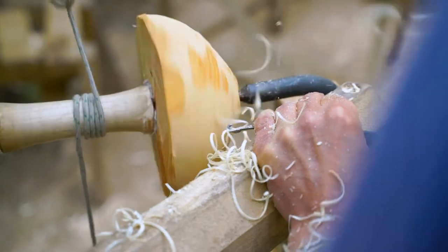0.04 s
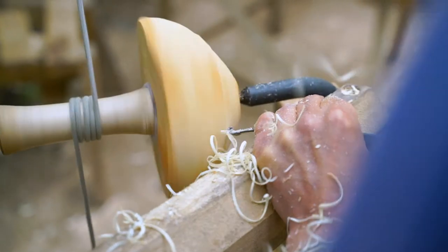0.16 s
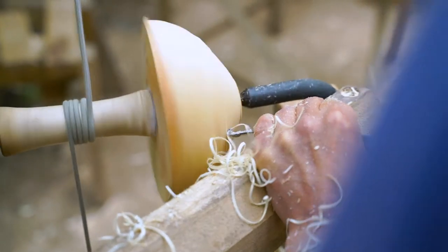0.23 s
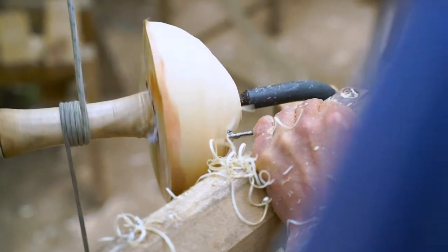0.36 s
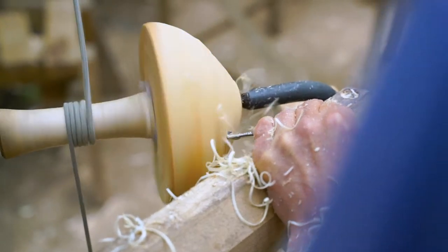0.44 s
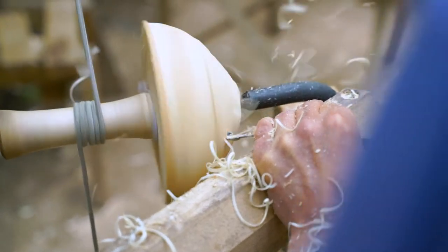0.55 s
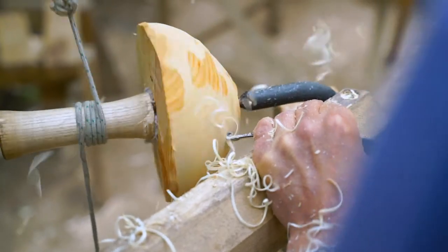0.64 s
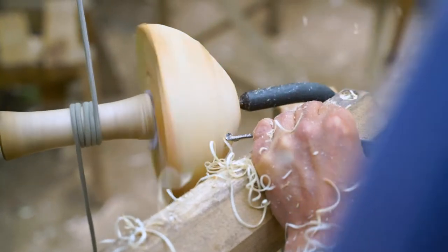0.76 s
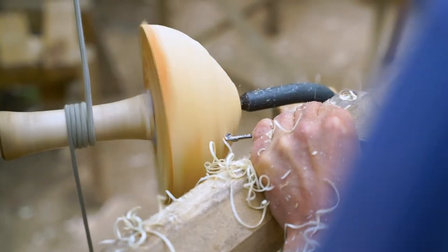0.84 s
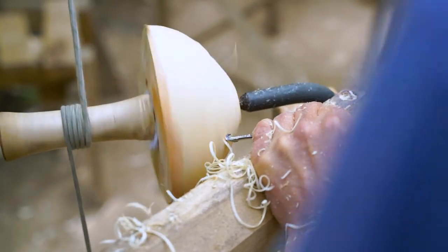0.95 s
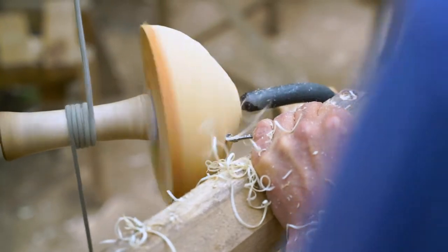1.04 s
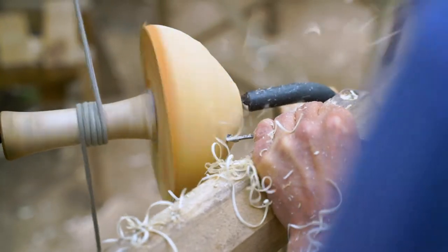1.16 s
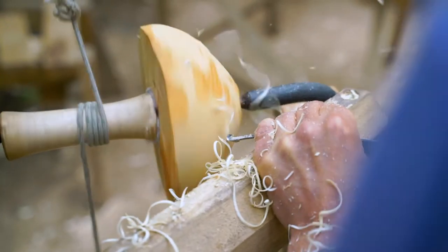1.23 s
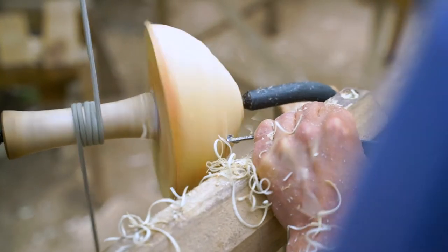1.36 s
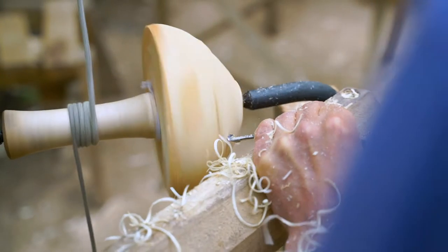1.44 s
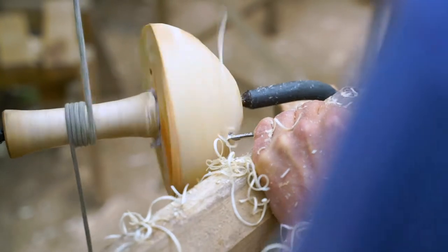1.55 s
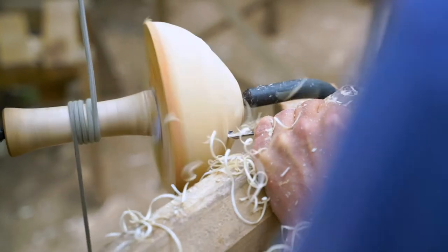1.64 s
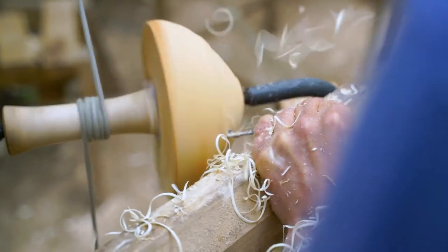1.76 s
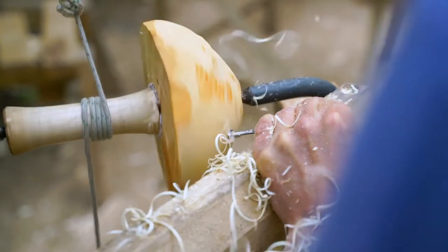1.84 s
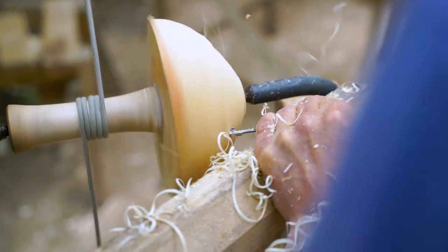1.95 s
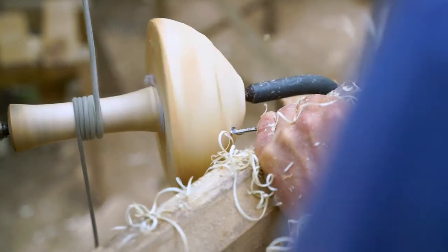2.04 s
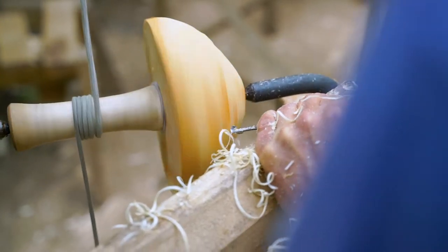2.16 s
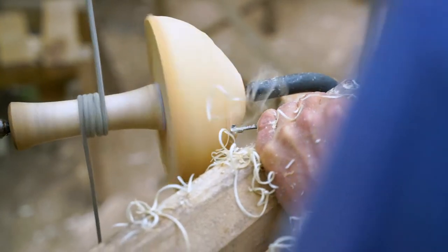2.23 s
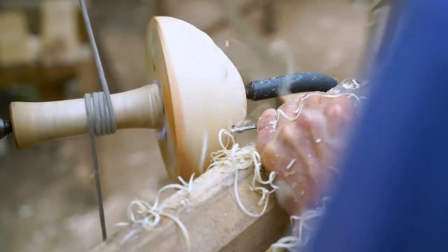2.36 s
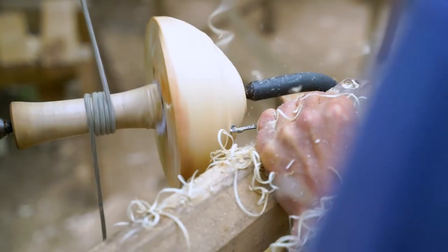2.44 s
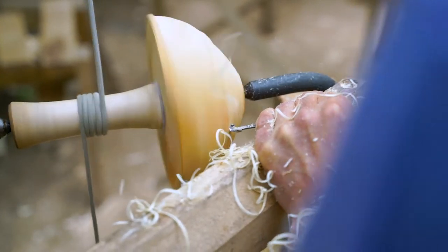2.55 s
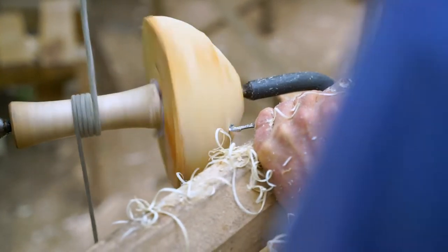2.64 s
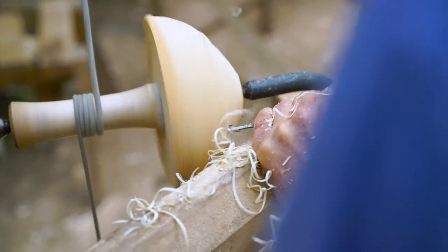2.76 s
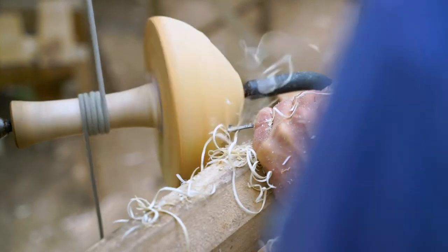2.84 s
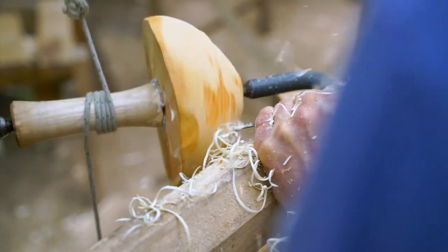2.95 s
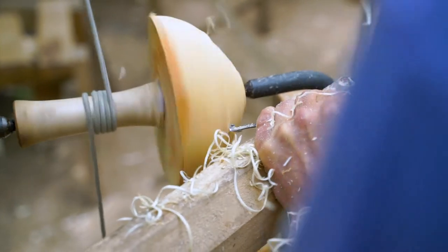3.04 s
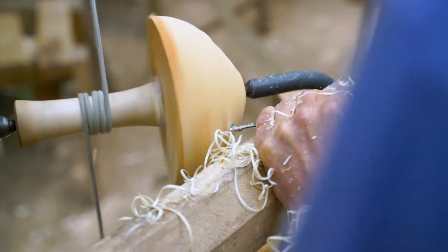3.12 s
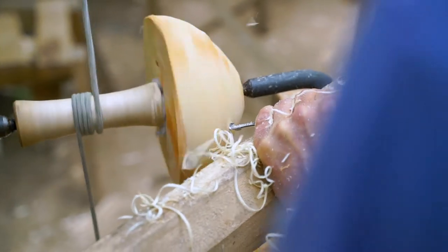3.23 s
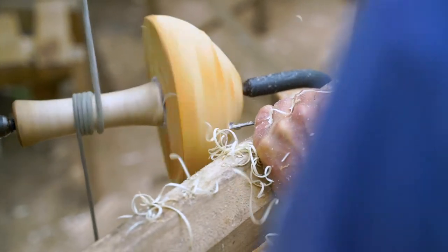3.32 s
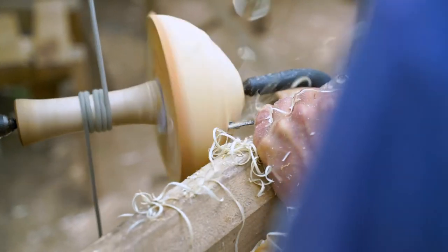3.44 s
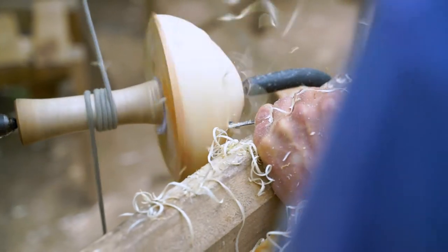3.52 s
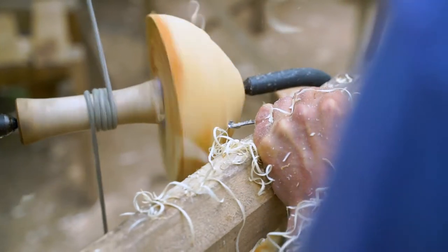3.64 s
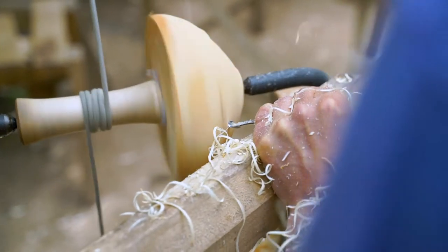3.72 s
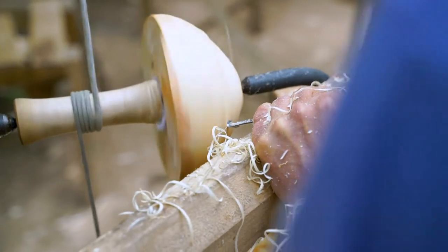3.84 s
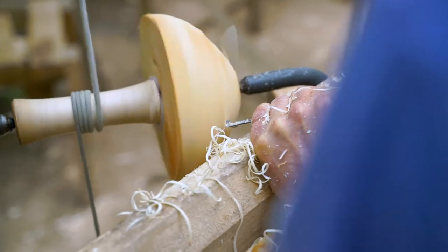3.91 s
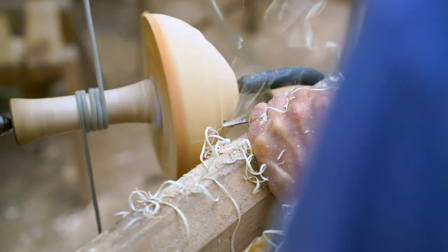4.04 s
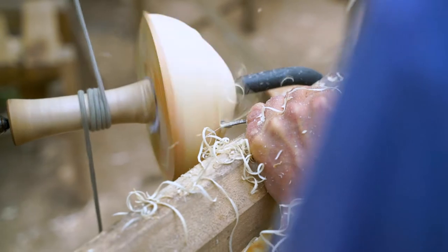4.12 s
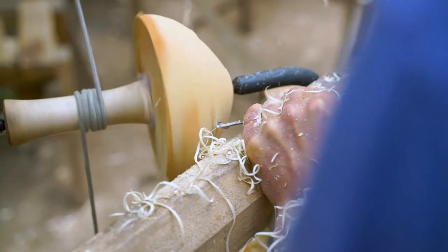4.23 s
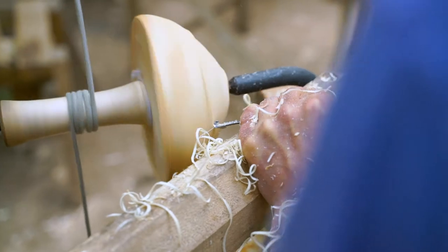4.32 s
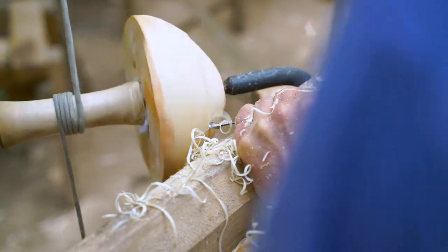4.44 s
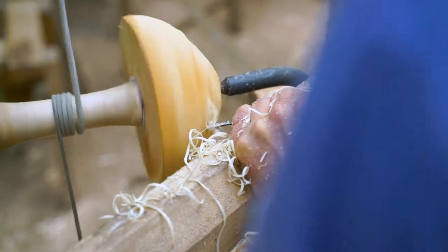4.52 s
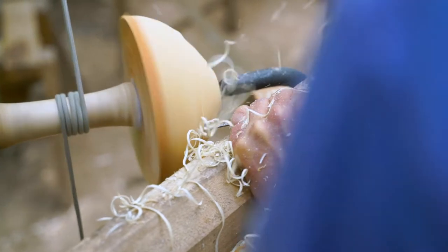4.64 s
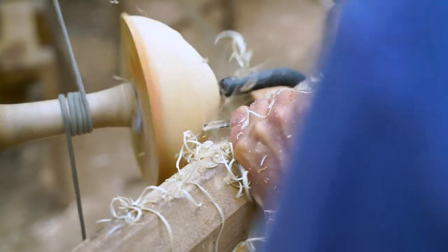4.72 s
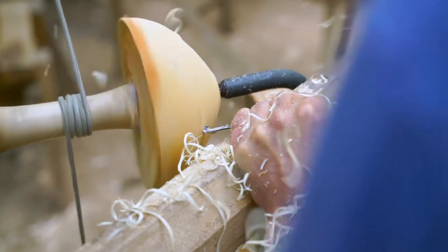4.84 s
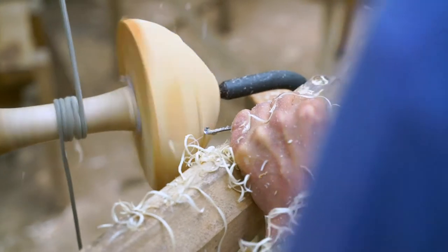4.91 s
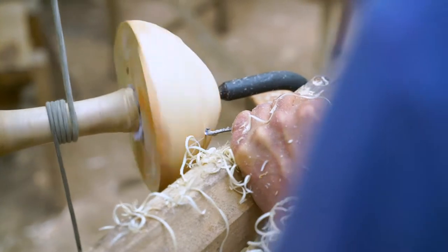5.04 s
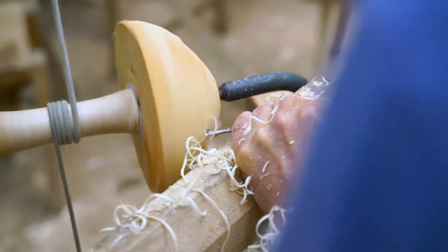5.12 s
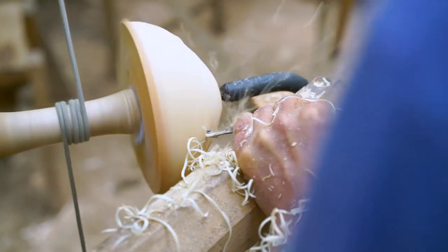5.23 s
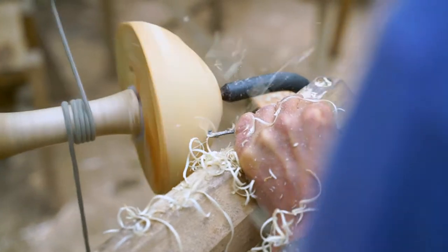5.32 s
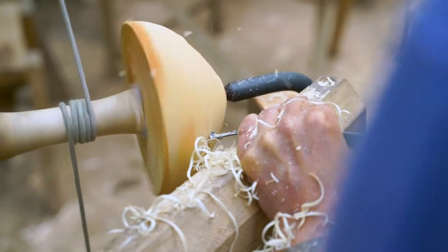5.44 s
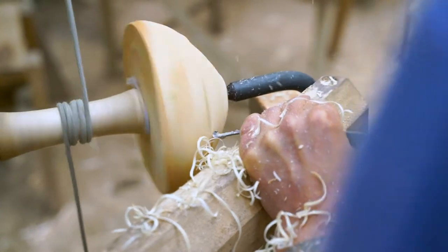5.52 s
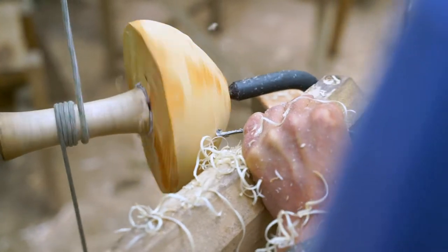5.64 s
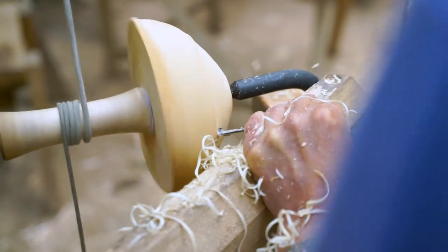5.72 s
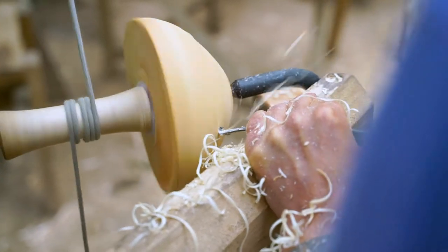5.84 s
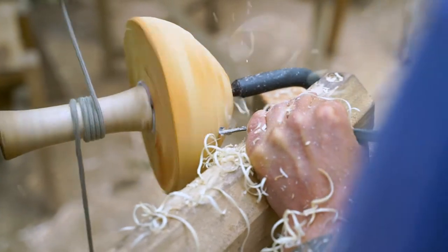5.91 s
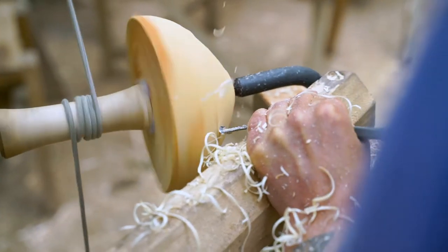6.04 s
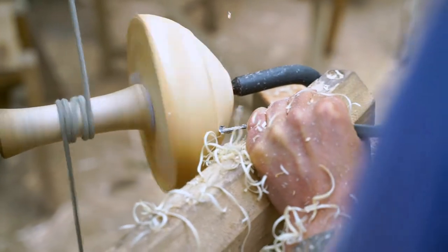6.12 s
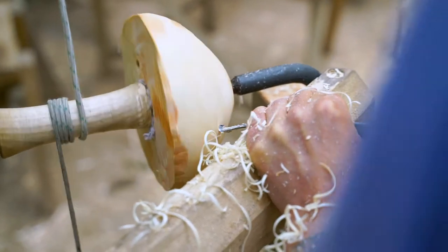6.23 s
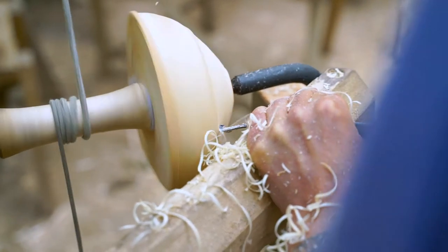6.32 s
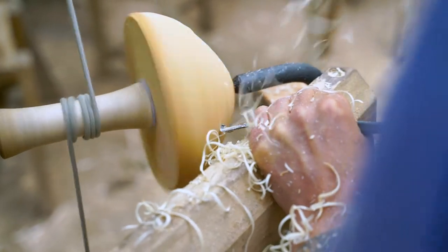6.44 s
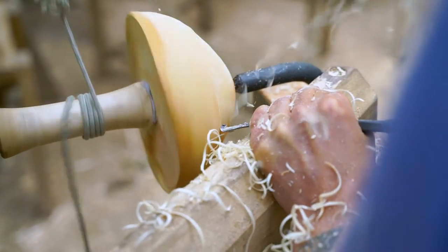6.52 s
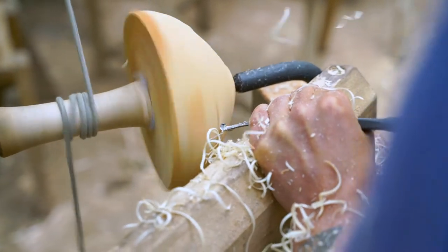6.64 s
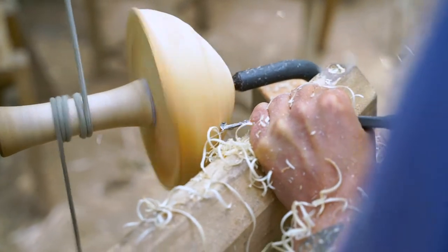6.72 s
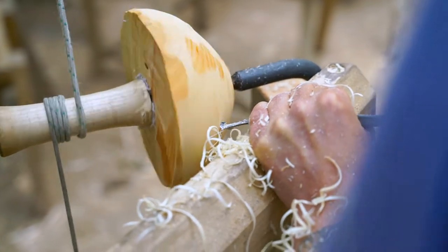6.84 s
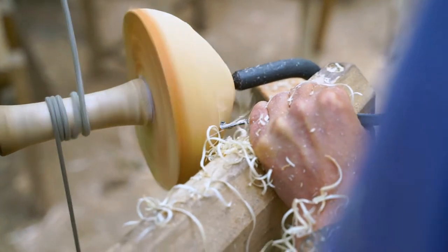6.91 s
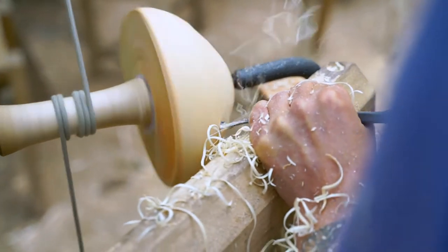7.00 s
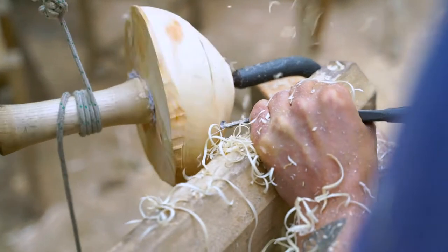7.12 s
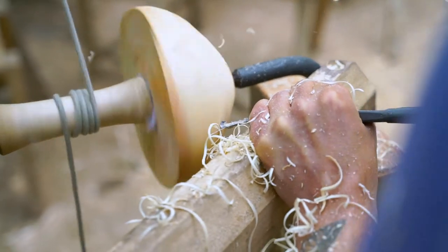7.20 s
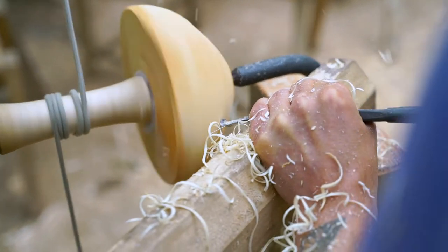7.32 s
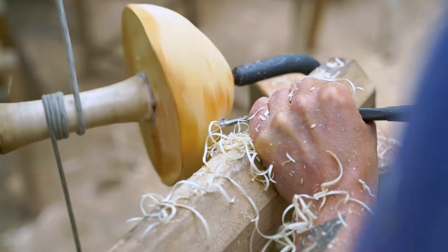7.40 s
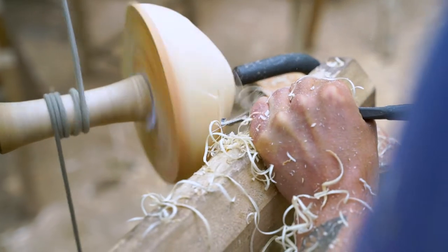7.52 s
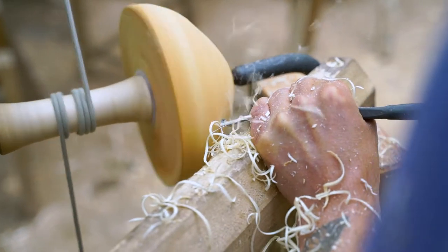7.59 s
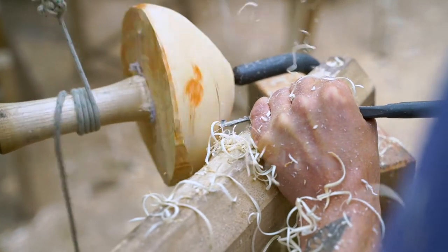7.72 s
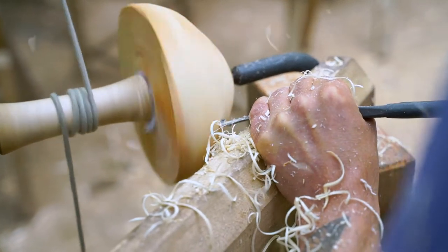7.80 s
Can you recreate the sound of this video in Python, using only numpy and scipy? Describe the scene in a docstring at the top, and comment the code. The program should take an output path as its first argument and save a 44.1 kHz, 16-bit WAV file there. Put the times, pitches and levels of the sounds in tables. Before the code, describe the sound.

A hook tool tears rhythmically at a spinning wooden bowl, rasping and chattering about every 0.6 seconds, with hissing shavings and soft wooden frame knocks.

```python
"""A hook tool cuts a wooden bowl on a treadle lathe: each down-stroke tears fibres, with dig-ins that chatter.
Fibre noise and pitched chatter ring resonances of bowl and tool; the return stroke only brushes the wood.
Shavings hiss as dense filtered crackle. The timber frame rattles and knocks through beam resonances.
Noise bursts give dry ticks; slow lumpy noise gives wind at a close stereo microphone, with faint reflections."""
import sys
import numpy as np
from scipy import signal
from scipy.fft import rfft, irfft, next_fast_len
from scipy.io import wavfile
from scipy.ndimage import uniform_filter1d

SR = 44100
rng = np.random.default_rng(int(sys.argv[2]) if len(sys.argv) > 2 else 0)


def int16_out(signal):
    """Quantize to a 16-bit WAV file."""
    q = np.round(np.clip(np.atleast_2d(signal).T, -1, 1) * 32767)
    wavfile.write(sys.argv[1], SR, q.astype(np.int16))


N = 346626
SIZE = next_fast_len(N + SR)
HZ = np.fft.rfftfreq(SIZE, 1 / SR)
TIME_S = np.arange(N) / SR

# cutting down-strokes: start_s, rise_s, length_s, crest_0_to_1, pressure_db, hiss_db, rattle_db
CUTTING_STROKES = [(-.16, 0.023, 0.24, 0.48, -13.5, -24.5, -26),
                   (0.4, 0.031, 0.27, 0.58, -13.5, -26.5, -26), (1.003, 0.063, 0.25, 0.2, -15, -25, -25),
                   (1.593, 0.0084, 0.25, 0.95, -14.5, -25.5, -26),
                   (2.165, 0.086, .25, 0, -11.5, -24, -23.5), (2.766, 0.053, 0.22, 0.26, -11, -22.5, -19),
                   (3.332, 0.061, 0.25, 0, -11, -25.5, -23.5),
                   (3.955, 0.047, 0.22, 0.16, -10.5, -24.5, -23.5),
                   (4.516, 0.05, 0.28, 0.44, -11, -27, -23), (5.205, 0.044, 0.17, 0.18, -14, -23.5, -25),
                   (5.825, 0.038, 0.13, 0.63, -15, -22.5, -23),
                   (6.325, 0.071, 0.22, 0.57, -13, -21.5, -20.5),
                   (6.915, 0.04, 0.22, 0.63, -13.5, -20.5, -22), (7.497, 0.028, 0.24, 0.9, -17.5, -20, -23)]
# returns, edge brushing the wood: start_s, rise_s, length_s, crest_0_to_1, pressure_db, hiss_db, rattle_db
RETURN_STROKES = [(0.251, 0.029, 0.13, 0.89, -29, -38, -24.5), (.79, 0.035, 0.21, 0.97, -39.5, -48, -30.5),
                  (1.375, 0.011, 0.18, 0.31, -29, -37, -20.5), (1.97, 0.024, 0.18, 0.37, -46, -41.5, -31),
                  (2.59, 0.044, 0.17, 0.41, -34, -47, -28.5), (3.069, 0.046, 0.21, 1, -28.5, -34, -23),
                  (3.73, 0.0078, 0.33, 0.65, -42.5, -57, -38), (4.301, 0.024, 0.031, 0.31, -31.5, -59, -35),
                  (4.46, 0.011, 0.029, 1, -38, -47, -24.5), (5.061, 0.015, 0.061, 0.18, -37, -45.5, -29),
                  (5.14, 0.027, 0.03, 0.32, -24.5, -48, -28),
                  (5.491, 0.026, 0.2, 0.51, -30.5, -41.5, -22.5),
                  (5.72, 0.035, 0.079, 0.43, -32, -44.5, -38), (6.191, 0.025, 0.091, 0.42, -28, -42.5, -23),
                  (6.721, 0.081, .15, 0.63, -28.5, -38.5, -23), (7.301, 0.0063, 0.15, 0.19, -51, -42, -36),
                  (7.40, 0.029, 0.13, 0.72, -33, -61, -19.5)]
# edge digging in: start_s, level_db, chatter_hz
DIG_INS = [(0.0074, -13.5, 2510), (0.0403, -8, 2393), (0.426, -22, 2270), (0.4596, -7, 1194),
           (0.499, -12, 2580), (0.535, -10, 2330), (0.566, -13.5, 2520), (0.601, -13, 2030),
           (0.6361, -11.5, 1923), (1.0514, -8, 1297), (1.1227, -10.5, 2430), (1.1529, -10.5, 2804),
           (1.182, -14.5, 2460), (1.216, -8.5, 2344), (1.62, -11.5, 1248), (1.6422, -4.5, 1174),
           (1.6854, -10, 1890), (1.7526, -10.5, 2380), (1.7825, -7.5, 2180), (1.821, -18, 2606),
           (2.187, -26, 1220), (2.2143, -19.5, 1200), (2.29, -16.5, 1880), (2.32, -11.5, 2460),
           (2.353, -14, 1752), (2.388, -12.5, 1557), (2.8075, -9, 1210), (2.8755, -16.5, 2470),
           (2.9005, -10, 2444), (2.963, -12.5, 1310), (3.405, -20, 2550), (3.4224, -11, 2190),
           (3.451, -11, 1950), (3.489, -10, 2384), (3.5229, -11.5, 1800), (3.553, -13, 1390),
           (3.9889, -10, 1208), (4.0286, -21, 1350), (4.059, -19, 1760), (4.0904, -11, 2460),
           (4.122, -11.5, 1630), (4.156, -9.5, 1410), (4.577, -6.5, 965), (4.6232, -11.5, 2520),
           (4.6603, -12, 1227), (4.696, -11, 2053), (4.7252, -16.5, 1257), (4.762, -7.5, 1733),
           (5.0764, -29.5, 1220), (5.188, -11.5, 1202), (5.2287, -18, 1167), (5.2576, -6.5, 2113),
           (5.2838, -11.5, 2760), (5.3113, -16, 2620), (5.346, -17, 2210), (5.3931, -24.5, 1224),
           (5.66, -28.5, 1210), (5.905, -13.5, 2350), (5.939, -19, 1242), (6.324, -26, 1240),
           (6.372, -19, 1210), (6.386, -19, 1290), (6.436, -18, 1270), (6.465, -19.5, 1246),
           (6.937, -18.5, 1193), (6.977, -19, 1266), (7.04, -10, 5130), (7.0851, -17, 1160),
           (7.101, -10, 6600), (7.428, -26.5, 1180), (7.499, -19, 1990), (7.5433, -13.5, 2290),
           (7.561, -9.5, 1323), (7.60, -9.5, 5240), (7.6212, -26, 1200), (7.632, -10, 6570),
           (7.663, -13.5, 6550), (7.693, -16.5, 1184), (7.728, -16.5, 6480)]
# bowl and tool modes: pitch_hz, width_hz (at -6 dB), flank_db, base_db, left_minus_right_db
BOWL_MODES = [(716, 26, -4.5, 0, 9), (1004.5, 65, -2, 4.5, 8), (1212.7, 68, 7, 10.5, 3.5),
              (1364, 61, -11, 11, 5), (1486, 195, -1, -37, 0.5), (1613, 210, -2.5, -30, -12),
              (1793, 107, 5, -24, 6), (2005, 130, 4.5, -2, 1.5), (2230, 327, 1.5, 3, 6),
              (2448, 61, 6, 5, -0.5), (2595, 114, 8.5, 2, 3), (2790, 444, 2.5, 1.5, -2.5),
              (3070, 18, 5.5, 2, 8), (3290, 170, -14.5, -4.5, -15.5), (3887, 350, -8.5, -8.5, 17.5),
              (4246, 99, 0, 5, -7.5), (5140, 103, 3, 3.5, 2.5), (6548, 88, 1.5, 0.5, 0)]
# unresonant response of bowl and tool: frequency_hz, level_db
BOWL_FLOOR = [(300, -41), (900, -7.5), (2500, -20), (4000, -12.5), (9000, -26.5)]
# tool moving from flank to base: time_s, base_share_0_to_1
TOOL_PLACE = [(5.6, 0.0033), (6.2, 0.96)]
# spectral shape of the shavings: frequency_hz, relative_db
SHAVING_SHAPE = [(2940, -17.5), (5000, 6), (6030, -5.5), (6770, 1), (7600, -3.5), (14200, -9),
                 (15800, -14.5)]
# frame resonances: pitch_hz, width_hz, level_db
FRAME_BEAMS = [(114.5, 21, -0.5), (215, 47.5, 3.5), (330, 140, 0.5), (558.4, 49.5, 5.5), (755, 79, -1),
               (1204, 110, 3.5), (2090, 310, -6)]
# treadle and frame knocks: start_s, level_db, ring_hz, thud_db, click_db
FRAME_KNOCKS = [(.12, -35, 540, -55, -50), (1.3951, -27, 398, -37, -17), (1.4572, -28, 232, -32, -12),
                (1.525, -24.5, 358, -36, -18), (1.54, -32, 197, -40, -32), (1.56, -29, 568, -45, -33),
                (1.901, -34, 570, -50, -50), (2.043, -28, 564, -54, -28), (2.119, -28.5, 548, -57, -46),
                (2.72, -30.5, 516, -51, -39), (3.144, -30, 298, -42, -41), (3.209, -30, 1178, -45, -28),
                (3.279, -30, 464, -45, -19), (3.293, -30, 343, -36, -28), (3.885, -33, 544, -54, -33),
                (4.488, -29, 576, -66, -55), (4.578, -23, 790, -65, -41), (5.5345, -33, 382, -51, -21),
                (5.554, -38, 304, -55, -25), (5.586, -37, 1170, -55, -23), (5.6012, -28, 395, -42, -16),
                (5.636, -26, 1200, -51, -32), (5.683, -30, 320, -55, -41), (6.01, -32, 560, -65, -45),
                (6.581, -24, 560, -60, -45), (6.845, -42, 546, -36, -37), (6.885, -28.5, 545, -36.5, -43),
                (7.014, -29, 480, -61, -37), (7.076, -30, 467, -52, -40), (7.17, -30.5, 534, -48, -45),
                (7.453, -26.5, 466, -36, -42), (7.77, -28, 550, -54, -47)]
# spectral shape of the outdoor floor: frequency_hz, relative_db
AIR_SHAPE = [(41, -31), (70, -2.5), (1100, -3), (4640, -15.5), (5320, -11), (15800, -15)]
# wind, before its flicker: time_s, level_db
WIND_LEVEL = [(0, -72), (4.3, -70), (5.4, -58), (5.49, -45), (5.53, -60), (5.68, -48), (6.1, -65),
              (6.33, -50), (6.37, -64), (6.7, -48), (6.74, -40.5), (6.9, -51), (7.06, -57), (7.24, -41),
              (7.32, -49), (7.86, -45)]
# dry ticks: start_s, level_db
DRY_TICKS = [(0.266, -32.5), (0.322, -26), (0.811, -33.5), (0.884, -35), (1.984, -34), (2.6357, -34),
             (3.195, -26.5), (3.80, -39), (4.3363, -34), (4.406, -33), (5.01, -37), (5.179, -35),
             (6.2074, -29), (6.7414, -28.5), (7.426, -25.5)]
# likeness of the two sides: frequency_hz, likeness_0_to_1
SIDE_LIKENESS = [(150, .99), (500, .96), (1250, .93), (2000, .8), (5000, .65), (12000, .4)]
# balance of the two sides: frequency_hz, left_minus_right_db
SIDE_BALANCE = [(600, 0), (1400, -4.5), (8000, -1.5), (15000, 2.5)]
# the near sounds dip in a narrow band: centre_hz, width_hz, depth_0_to_1
NEAR_NOTCHES = [(4757, 790, 1)]
# stroke shape: sag_db either side of the crest, release_db_per_s, overhang_s
PRESSURE_LAW, HISS_LAW, RATTLE_LAW = (1.34, 269, 0.0), (6.2, 222, 0.0), (4.64, 320, 0.055)


def gain_of(db):
    """Amplitude factor of a level in dB."""
    return 10 ** (np.asarray(db) / 20)


def evened(x):
    """Scales to an overall RMS of 1."""
    return x / np.sqrt(np.mean(x ** 2) + 1e-20)


def read(points):
    """Interpolates a table over log frequency."""
    hz, value = np.transpose(points)
    return np.interp(np.log(HZ + 1), np.log(hz + 1), value)


def curve(rows, axis):
    """Interpolates one column over time."""
    return np.interp(TIME_S, *np.transpose(rows)[[0, axis]])


def add(mix, start_s, sound):
    """Adds a sound in place, cut at the end of the mix."""
    part = mix[..., round(start_s * SR):][..., :sound.shape[-1]]
    part += sound[..., :part.shape[-1]]


def peak(hz, width_hz):
    """Causal response of one resonance, gain 1 at its centre."""
    return 1 / (1 + 2j * (HZ - hz) / max(width_hz, 5))


def causal(magnitude):
    """Gives a magnitude the least phase, so that it rings after the blow and not before."""
    folded = irfft(np.log(magnitude), SIZE)
    folded[..., 1:(SIZE + 1) // 2] *= 2
    folded[..., SIZE // 2 + 1:] = 0
    return np.exp(rfft(folded))


def through(pair, response):
    """Filters two like signals into left and right with the tabled likeness and balance."""
    a, b = rfft(pair, SIZE)
    same = np.clip(read(SIDE_LIKENESS), 0, 1)
    side = gain_of(read(SIDE_BALANCE) / 2)
    # short waves take unlike paths to the two sides
    side = side * np.exp(.6j * np.sin(HZ / 260) * np.clip(HZ / 850 - 1, 0, 1))
    left = a * side
    right = (same * a + np.sqrt(1 - same ** 2) * b) / side
    return irfft(np.array([left, right]) * response, SIZE)[:, :N]


def fibres(per_s, spread_db):
    """Fibres snap at random moments, a few far louder; two signs for two paths."""
    size = gain_of(spread_db * np.minimum(rng.exponential(1, N), 5))
    snaps = size * (rng.random(N) < per_s / SR)
    return evened(snaps * rng.standard_normal((2, N)))


def flicker(cutoff_hz, rms_db):
    """Random level unevenness: low-passed noise in dB."""
    lowpass = signal.butter(2, cutoff_hz, fs=SR, output="sos")
    smooth = signal.sosfilt(lowpass, rng.standard_normal(N))
    return gain_of(rms_db * evened(smooth))


def effort(law, axis):
    """Each stroke and return rises, swells to a crest, sags and dies away at a steady dB rate."""
    sag_db, release_db_per_s, overhang_s = law
    onset_db = -29.5  # below the crest
    t = TIME_S[::32]
    out = np.zeros(len(t))
    for row in CUTTING_STROKES + RETURN_STROKES:
        start, rise, length, crest = row[:4]
        up = start + max(rise, .002)
        end = start + max(length + overhang_s, rise + .004)
        top = up + np.clip(crest, .05, .95) * (end - up)
        levels_db = [onset_db, -sag_db, 0, -sag_db, -sag_db - release_db_per_s]
        shape_db = np.interp(t, [start, up, top, end, end + 1], levels_db)
        out += gain_of(row[axis] + shape_db) * (t >= start)
    return np.interp(TIME_S, t, out)


def patchy(x, db, bins, frames):
    """The colour keeps shifting in small patches as the grain of the wood turns past the edge."""
    z = signal.stft(x, nperseg=256, noverlap=192)[2]
    patches = uniform_filter1d(rng.standard_normal(z.shape[1:]), bins, 0)
    patches = uniform_filter1d(patches, frames, 1)
    gain = gain_of(db * evened(patches))
    return signal.istft(z * evened(gain), nperseg=256, noverlap=192)[1][:, :N]


def bowl(column):
    """Left and right response for one place of the tool; the modes of a spinning bowl add by power."""
    power = np.tile(gain_of(2 * read(BOWL_FLOOR)), (2, 1))
    for mode in BOWL_MODES:
        ring = gain_of(2 * mode[column]) * abs(peak(*mode[:2])) ** 4
        power = power + ring * gain_of([[mode[4]], [-mode[4]]])
    return causal(np.sqrt(power))


def cut(chatter, clumps, swell):
    """Steady tearing under the pressure plus the dig-ins ring bowl and tool; chatter is also heard directly."""
    pressure = effort(PRESSURE_LAW, axis=4) * flicker(60, 1.8) * (.7 + 2 * swell)
    tearing = pressure * fibres(7000, 1.3) + gain_of(-4) * clumps
    base_share = np.clip(curve(TOOL_PLACE, axis=1), 0, 1)
    across = patchy(tearing, 2.8, bins=4, frames=14)  # the flank's grain turns; the base cuts evenly
    chatter_in = gain_of(-7.5) * chatter
    flank = through((across + chatter_in) * np.sqrt(1 - base_share), bowl(column=2))
    base = through((tearing + chatter_in) * np.sqrt(base_share), bowl(column=3))
    return flank + base + through(chatter, gain_of(-10))


def shavings(swell):
    """The ribbon curling off the edge hisses in fine crackle and flares at each dig-in."""
    crackle = flicker(35, .8) * (1 + 1.8 * swell) * fibres(30000, .6)
    crackle = patchy(crackle, 3, bins=7, frames=8)
    hiss = evened(through(crackle, gain_of(read(SHAVING_SHAPE))))
    return effort(HISS_LAW, axis=5) * hiss


def frame():
    """The timber frame rattles with the drive cord and knocks as the treadle turns over."""
    blow_db, click_s = 12, 0.00011  # knock drive into the beams; contact time scale
    blows = effort(RATTLE_LAW, axis=6) * flicker(43.0, 2.1) * fibres(1400, 1.5)
    t, rings = np.arange(6000) / SR, np.zeros(N)
    u = t / click_s
    noises = rng.standard_normal((len(FRAME_KNOCKS), 2, len(t)))
    for (s, db, hz, thud_db, click_db), noise in zip(FRAME_KNOCKS, noises):
        blow = noise * np.exp(-t / 0.0037)
        ring = np.sin(2 * np.pi * hz * t) * np.exp(-t / 0.015) * (1 - np.exp(-t / 0.0037))
        thud = np.sin(2 * np.pi * FRAME_BEAMS[0][0] * t) * np.exp(-t / 0.027)  # lowest beam
        click = -np.e * u * (2 - u) * np.exp(-u)
        add(blows, s, gain_of(db + blow_db) * blow)
        add(rings, s, gain_of(db) * ring)
        add(rings, s, gain_of(thud_db) * thud)
        add(rings, s, gain_of(click_db) * click)
    beams = 0
    for k, (hz, width_hz, db) in enumerate(FRAME_BEAMS):
        beams = beams + (-1) ** k * gain_of(db) * peak(hz, width_hz)  # alternating sign
    return rings + through(blows, beams * HZ / (HZ + 90))


def air():
    """Quiet outdoor floor of shaped noise, and lumpy low-frequency wind on the microphone."""
    floor_db = -49.5  # RMS before flicker
    floor = evened(through(rng.standard_normal((2, N)), gain_of(read(AIR_SHAPE))))
    bandpass = signal.butter(2, [28, 80], "bandpass", fs=SR, output="sos")
    a, b = signal.sosfilt(bandpass, rng.standard_normal((2, N)))
    pair = np.array([a + .12 * b, a - .12 * b])  # nearly alike on both sides
    gusts = evened(pair) * flicker(6, 3.5)
    floor = gain_of(floor_db) * floor * flicker(12, 3.5)
    return floor + gain_of(curve(WIND_LEVEL, axis=1)) * gusts


def dig_ins(wobble_hz=110):
    """Each dig-in is a short swell: the edge chatters round one pitch and tears a clump of fibres."""
    rise_s, fall_s, fall_spread = .0035, .0045, .3
    t = np.arange(2600) / SR
    chatter, clumps, swell = np.zeros((2, N)), np.zeros((2, N)), np.zeros(N)
    noises = rng.standard_normal((len(DIG_INS), 4, len(t)))
    for (s, db, hz), noise in zip(DIG_INS, noises):
        fall = fall_s * np.exp(fall_spread * np.tanh(noise[0, 0]))
        shape = (1 - np.exp(-t / rise_s)) ** 2 * np.exp(-t / fall)
        shape = gain_of(db) * shape / shape.max()
        drift = evened(uniform_filter1d(noise[2:], size=60))
        turns = np.cumsum(hz + wobble_hz * drift, axis=1) / SR + noise[2:, :1]
        s -= rise_s / 2  # the swell starts softly, ahead of the audible bite
        add(chatter, s, shape * np.sin(2 * np.pi * turns))
        add(clumps, s, shape * noise[:2])
        add(swell, s, shape)
    return chatter, clumps, swell


def shelter(x, t60_s=0.43):
    """Sparse reflections from posts and roof, other taps for each side; the bass passes by them."""
    t = np.arange(SR // 2) / SR
    signs = rng.choice([-1., 1.], (2, len(t)))
    sparse = rng.random((2, len(t))) < .05
    taps = signs * sparse * gain_of(-60 * t / t60_s) * (t > .006)
    bandpass = signal.butter(2, [1200, 5000], "bandpass", fs=SR, output="sos")
    taps = signal.sosfilt(bandpass, taps)
    taps = taps / np.linalg.norm(taps, axis=1, keepdims=True)
    return signal.fftconvolve(x, taps, axes=1)[:, :N]


def ticks():
    """Short bright snaps: noise bursts with a fast rise and exponential decay."""
    out, t = np.zeros((2, N)), np.arange(1500) / SR
    shape = np.exp(-t / 0.01) * (1 - np.exp(-t / 0.00089))
    noises = rng.standard_normal((len(DRY_TICKS), 2, len(t)))
    for (s, db), noise in zip(DRY_TICKS, noises):
        add(out, s, gain_of(db) * noise * shape)
    return through(out, 0.91)


def scene():
    """Sums the lathe sounds, adds reflections, notches them, then adds the air."""
    chatter, clumps, swell = dig_ins()
    near = cut(chatter, clumps, swell) + shavings(swell) + frame() + ticks()
    near = near + gain_of(-15) * shelter(near)
    dips = 1
    for hz, width_hz, depth in NEAR_NOTCHES:
        dips = dips * (1 - np.clip(depth, 0, 1) * peak(hz, width_hz))
    return irfft(rfft(near, SIZE) * dips, SIZE)[:, :N] + air()


def record(dry):
    """Limits the band with a steep linear-phase low-pass."""
    cutoff_hz = 15935
    lowpass = signal.firwin(1023, cutoff_hz, window=("kaiser", 10), fs=SR)
    return signal.oaconvolve(dry, lowpass[None], "same")


dry = scene()
out = record(dry)
int16_out(out)
```